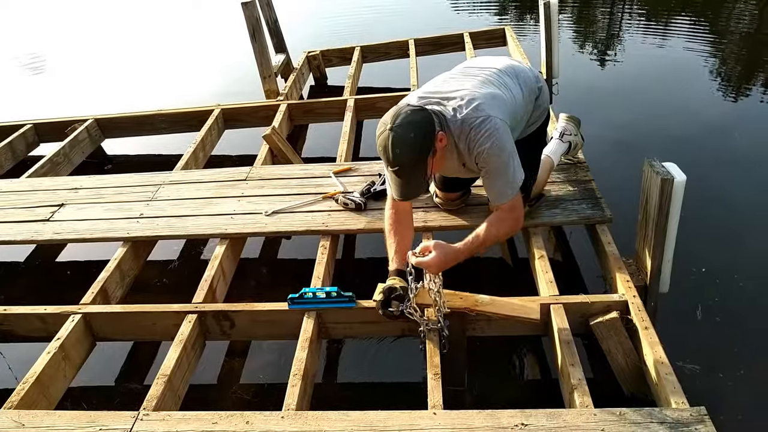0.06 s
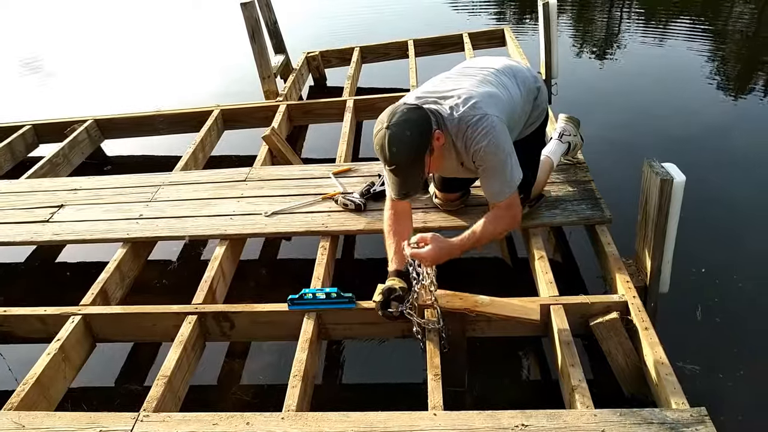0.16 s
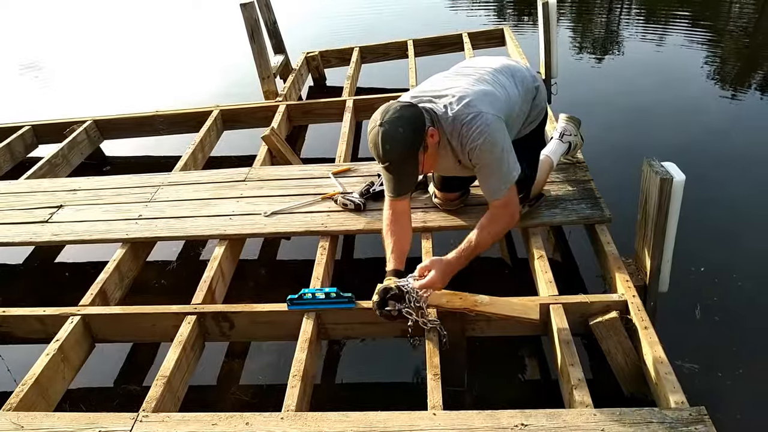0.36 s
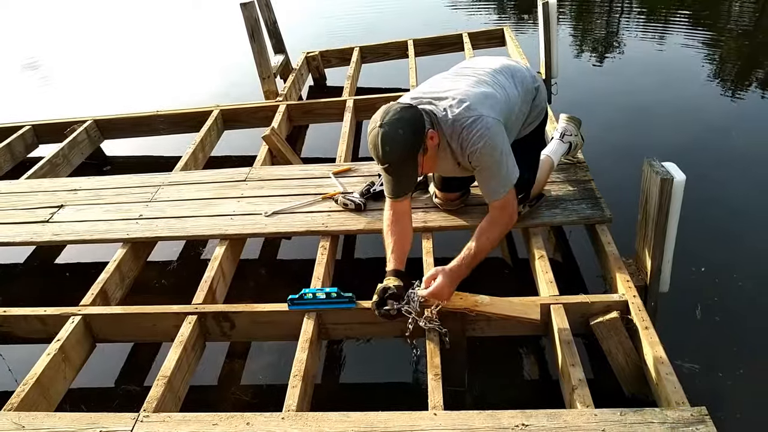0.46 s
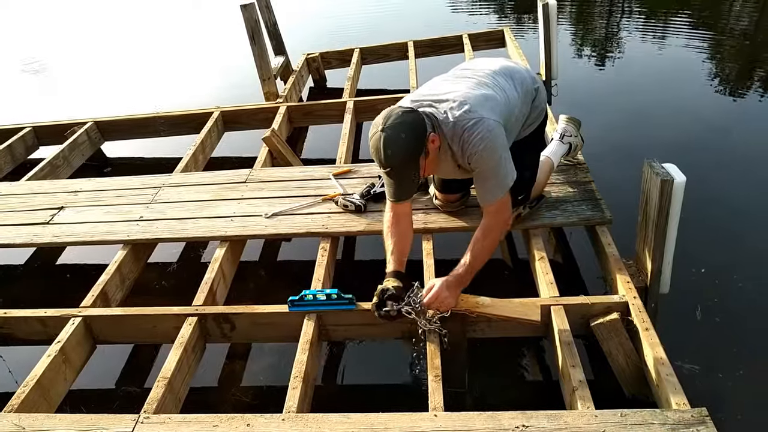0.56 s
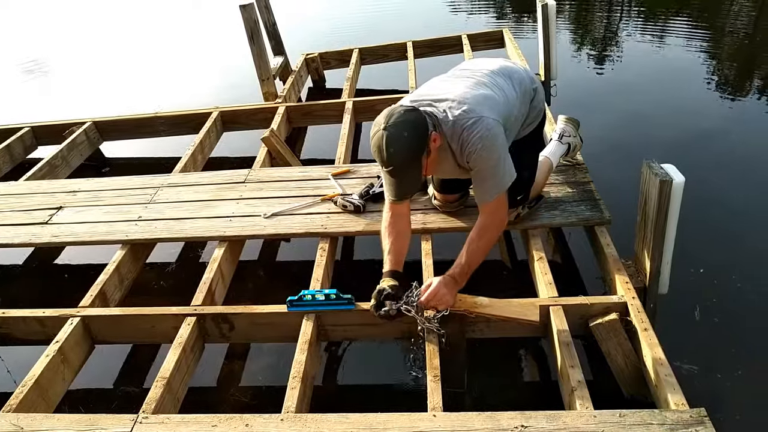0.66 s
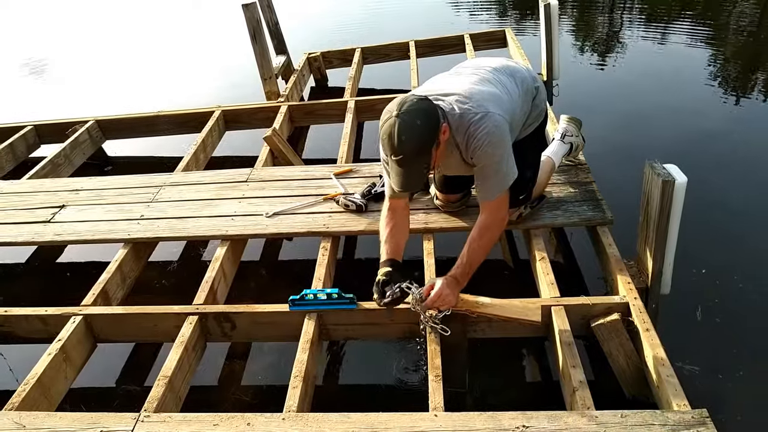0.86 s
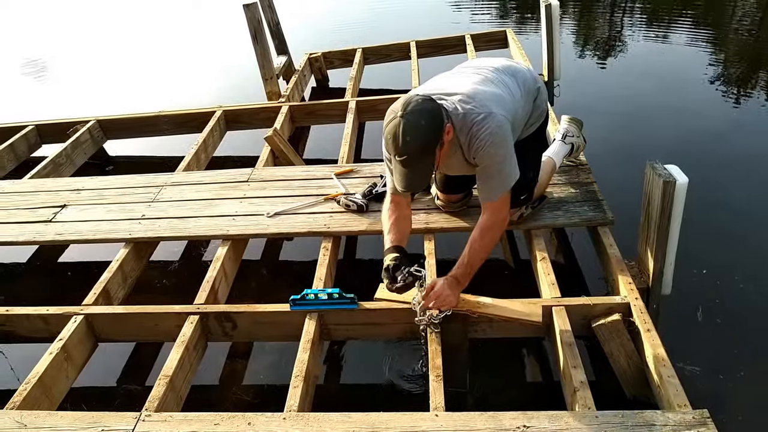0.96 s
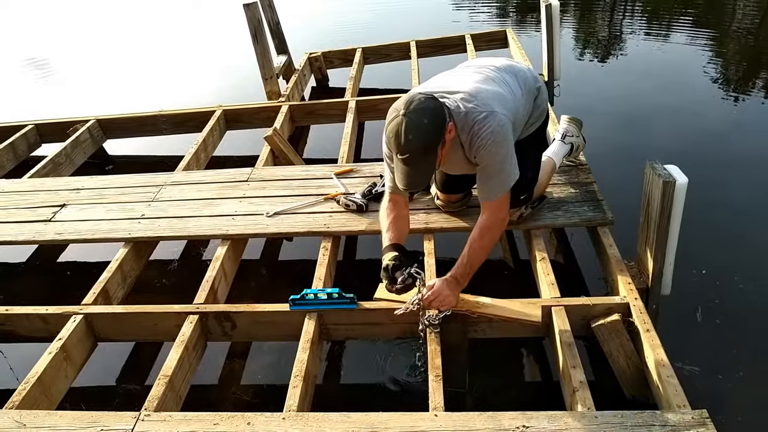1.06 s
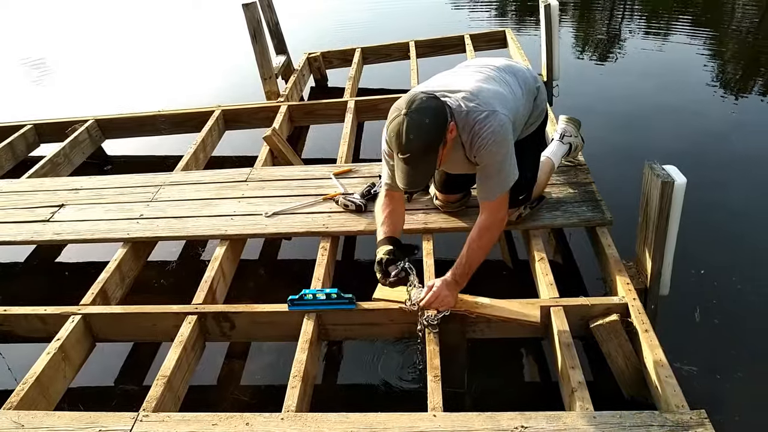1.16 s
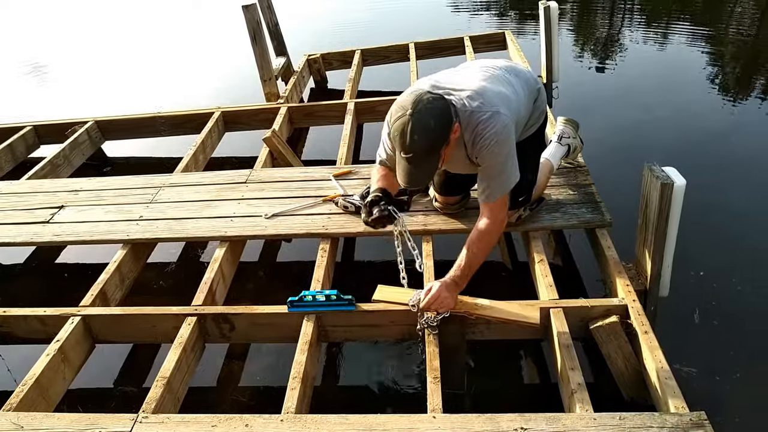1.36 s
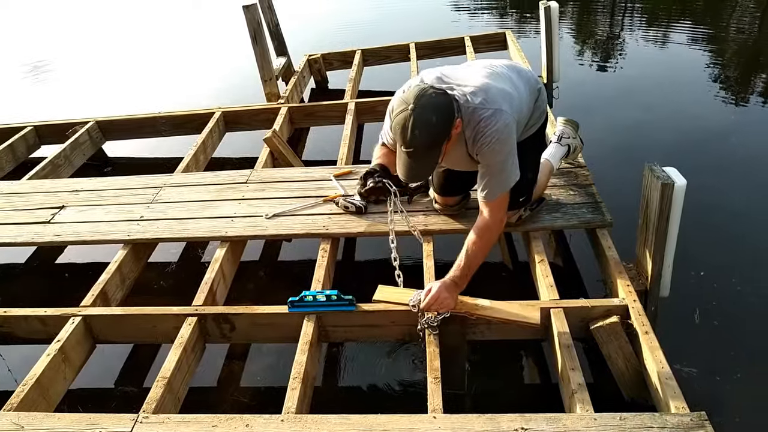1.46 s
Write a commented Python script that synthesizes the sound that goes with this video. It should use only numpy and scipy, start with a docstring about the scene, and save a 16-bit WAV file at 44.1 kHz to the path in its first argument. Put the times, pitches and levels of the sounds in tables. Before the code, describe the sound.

Small metal chain links jingle brightly on timber, then thin to soft ticks.

```python
"""Faint wind blows over open water as a steel chain is lowered onto the joists of a wooden dock.
From the start its small links collide, ticking and ringing very high in their bending modes, and
the timber rumbles where they slide. A larger steel piece clinks; then the wood knocks and the
rattle peaks. After a lull the larger piece clinks again, and the chain is picked at and lifted
in sparser, softer ticks and knocks."""
import sys
import numpy as np
from scipy import signal
from scipy.fft import rfft, irfft, next_fast_len
from scipy.io import wavfile
from scipy.ndimage import map_coordinates

SR = 44100
rng = np.random.default_rng(int(sys.argv[2]) if len(sys.argv) > 2 else 0)


def int16_out(signal):
    """Quantize to a 16-bit WAV file."""
    q = np.round(np.clip(np.atleast_2d(signal).T, -1, 1) * 32767)
    wavfile.write(sys.argv[1], SR, q.astype(np.int16))


N = 66150
STEEL_WIDTH, WOOD_WIDTH, WIND_WIDTH = 0.74, 0.41, 0.16  # side over mid
SIDES = np.array([[1], [-1]])  # left, right


def amp(db):
    """Amplitude ratio of a level in decibels."""
    return 10 ** (np.asarray(db) / 20)


def unit(x):
    """Normalisation to an rms of 1."""
    return x / np.sqrt(np.mean(x ** 2) + 1e-20)


def fade(t, t60):
    """Exponential damping: 60 dB lost in t60 seconds."""
    return np.exp(-np.log(1000) * t / t60)


def rise(t, attack_s):
    """First-order build-up with time constant attack_s."""
    return 1 - np.exp(-t / attack_s)


def add(out, start_s, x):
    """Superposition: x joins out from start_s on."""
    i = min(max(round(start_s * SR), 0), N - 1)
    out[:, i:i + x.shape[1]] += x[:, :N - i]


def colour(x, points, tilt=0):
    """Minimum-phase filter of unit power gain through (Hz, dB) points, tilted in dB per octave."""
    m = 2 * next_fast_len(x.shape[1])
    octave = np.log2(np.fft.rfftfreq(m, 1 / SR) + 1)
    hz, db = np.transpose(points)
    gain = unit(amp(np.interp(octave, np.log2(hz), db + tilt * np.log2(hz))))
    cepstrum = irfft(np.log(np.maximum(gain, 1e-6)))
    cepstrum[1:m // 2] *= 2  # folding onto positive time makes the filter causal
    cepstrum[m // 2 + 1:] = 0
    return irfft(rfft(x, m) * np.exp(rfft(cepstrum)), m)[:, :x.shape[1]]


def noise(count, width):
    """Partly coherent stereo white noise; width is side over mid."""
    mid, side = rng.standard_normal((2, count))
    return mid + width * side * SIDES


def panned(x, db):
    """Level difference: db is added left and taken right."""
    return x * amp(db * SIDES)


def contacts(curve, per_s, scatter_db):
    """A random point process: contact times, with gains scattered about a level curve."""
    jitter, chance = rng.random((int(per_s * N / SR), 2)).T
    times = (np.arange(len(jitter)) + 2 * jitter) / per_s
    size = unit(amp(scatter_db * np.minimum(-np.log(1 - chance), np.pi)))
    return zip(times, size * amp(np.interp(times, *np.transpose(curve))))


# Spectrum of the wind: frequency_hz, level_db
WIND_SPECTRUM = [(20, -33), (60, 4), (130, 0), (280, 5.5), (600, -4.5), (1300, -25.5), (3000, -13.5),
                 (8000, -17.5), (16000, -89)]
def wind(level_db=-72.5, swell_db=4):
    """Amplitude-modulated noise: light wind over the water swells gently."""
    swell = map_coordinates(rng.standard_normal(12), [np.linspace(0, 10, N)])
    return amp(level_db + swell_db * swell) * colour(noise(N, WIND_WIDTH), WIND_SPECTRUM)


def ring(t, hz, t60):
    """Damped free vibration of one steel mode, arriving left and right out of step."""
    phase = STEEL_WIDTH * rng.uniform(0.82, 1) * rng.choice([-1, 1]) * SIDES
    return np.sqrt(2) * np.sin(2 * np.pi * hz * t + phase) * fade(t, t60) * rise(t, 0.00071)


def tick(t, rebound_s=0.00405, attack_s=.0002, chink_hz=8500):
    """Impact transient of steel on steel: a touch, a rebound, chatter and three brief pitched chinks."""
    since_rebound = np.maximum(t - rebound_s * rng.uniform(0.518, 1), 0)
    touch, rebound = (fade(age, t60=0.0036) * rise(age, attack_s) for age in (t, since_rebound))
    chatter = amp(-8.5) * fade(t, t60=0.036) * rise(t, rebound_s / 2)
    crack = noise(len(t), STEEL_WIDTH) * (touch + amp(-1) * rebound + chatter)
    chinks = sum(ring(t, chink_hz * np.exp(.15 * z), t60=.03) for z in rng.standard_normal(size=3))
    return crack + amp(-9) * chinks / 2 * rise(t, attack_s)


# Spectrum of a tick: frequency_hz, level_db
TICK_SPECTRUM = [(1000, -15.5), (2800, -14.5), (5300, -11.5), (7000, -5.5), (8600, -2.5), (10500, -6),
                 (12700, -3.5), (14000, 7), (15200, 2.5), (16000, -30)]
def steel_response(ticks):
    """Resonant filtering: the ticks are strongest near the pitch of the links."""
    return colour(ticks, TICK_SPECTRUM)


# Bending modes of a link, two lower and one upper, all near 14 kHz: pitch_hz
LINK_MODES_HZ = [13835, 14165, 14850]
# Decay of the same modes: t60_s
LINK_DECAYS_S = [0.21, 0.05, 0.37]
SECOND_MODE_DB, RING_PAN_DB = -2, 2.5
# How hard the chain is shaken: time_s, level_db
SHAKING = [(0, -38), (.05, -43.5), (.17, -59.5), (.21, -46), (.29, -32), (.32, -26), (.42, -23.5),
           (.47, -32), (.52, -28.5), (.55, -26.5), (.62, -34.5), (.71, -64.5), (.79, -60), (.84, -38),
           (.9, -41.5), (.96, -43), (1.09, -76), (1.19, -48), (1.25, -85.5), (1.37, -55), (1.5, -74)]
def rattle(per_s=260, heap_damping=0.67, detune=.0048):
    """Incoherent summation: many links collide, each at its own pitch, damped by the moving heap."""
    def share(x):
        """Energies add: per_s such contacts a second have unit power."""
        return x / np.sqrt(np.sum(x ** 2) / 2 * per_s / SR)

    rings, ticks = np.zeros((2, 2, N))
    t = np.arange(SR // 6) / SR
    modes = list(zip(LINK_MODES_HZ, [0, SECOND_MODE_DB, -14], LINK_DECAYS_S))
    for start_s, gain in contacts(SHAKING, per_s, scatter_db=2.8):
        link = sum(amp(db) * ring(t, hz * (1 + detune * rng.normal()), t60 * heap_damping)
                   for hz, db, t60 in modes)
        add(rings, start_s, gain * share(link))
        add(ticks, start_s, gain * share(tick(t[:len(t) // 4])))
    return amp(-2.5) * panned(rings, RING_PAN_DB) + amp(-13) * panned(steel_response(ticks), db=-0.07)


# Links dragging over the joist: time_s, level_db
DRAGGING = [(0, -73.5), (.11, -74), (.15, -63), (.2, -69.5), (.26, -59.5), (.33, -54), (.47, -56.5),
            (.62, -54), (.66, -70), (.73, -73.5), (.82, -71.5), (.87, -64.5), (.96, -74), (1.05, -82),
            (1.13, -70), (1.35, -74.5), (1.38, -66), (1.42, -68), (1.46, -84.5)]
# Response of the joist: frequency_hz, level_db
JOIST_SPECTRUM = [(60, -15.5), (170, -14.5), (260, 0.5), (480, -0.5), (800, 2), (1350, -7.5), (1850, -6),
                  (2180, -0.5), (2750, -12), (5000, -8.5), (9000, -19)]
def drag(per_s=300, clack_hz=850, decay_cycles=11):
    """Forced vibration: sliding links bump the joist, each with dull noise and a brief pitch."""
    out, t = np.zeros((2, N)), np.arange(SR // 25) / SR
    for start_s, gain in contacts(DRAGGING, per_s, scatter_db=2):
        hz = clack_hz * np.exp(.66 * np.clip(rng.normal(), -2, 2))
        clack = np.sin(2 * np.pi * hz * t) * fade(t, decay_cycles / hz)
        burst = noise(len(t), WOOD_WIDTH) * fade(t, t60=.016)
        bump = amp(-3.5) * unit(burst) + amp(-9) * unit(clack)
        add(out, start_s, gain * bump * np.sqrt(SR / per_s / len(t)))
    return colour(out, JOIST_SPECTRUM)


def flutter(t, depth_db=3, per_s=90):
    """Amplitude modulation: the gain wavers as a ringing link swings."""
    knots = rng.standard_normal(int(t[-1] * per_s) + 2)
    return unit(amp(depth_db * map_coordinates(knots, [t * per_s])))


# Single links striking, levels relative: start_s, tick_db, lower_ring_db, upper_ring_db
LINK_STRIKES = [(.001, -53.5, -38.5, -53), (0.032, -59, -38, -55), (.081, -43.5, -42, -56),
                (.143, -50.5, -46, -54.5), (.185, -39.5, -31, -46), (.237, -48, -31.5, -49),
                (0.251, -41.5, -33, -41), (.262, -39.5, -41, -46), (.308, -36.5, -21, -30),
                (0.315, -35, -22.5, -31), (.331, -34, -18.5, -25), (.356, -36.5, -27, -37),
                (0.388, -32.5, -32, -47), (0.406, -29, -24.5, -40), (0.426, -38, -27, -38),
                (.433, -40, -18, -31), (0.484, -45, -24.5, -42), (.495, -36, -18, -40),
                (0.501, -30.5, -20, -36), (.507, -32, -44, -37), (.543, -31.5, -38, -45),
                (0.763, -42.5, -79, -83), (0.804, -47.5, -58, -56), (.861, -38, -39, -55),
                (.872, -52, -38, -32.5), (.978, -45, -49, -43.5), (0.999, -43, -61, -71),
                (1.017, -45.5, -31, -41), (1.054, -48.5, -38, -38.5), (1.113, -51.5, -45.5, -69),
                (1.139, -46.5, -36.5, -37), (1.165, -62, -37, -49), (1.213, -53.5, -49.5, -69),
                (1.329, -55.5, -48, -64), (1.471, -54, -74, -97)]
def clinks(free_detune=.0025, held_detune=.0048):
    """Contact damping: a free link strikes a gripped one and rings until the next strike chokes it."""
    rings, ticks = np.zeros((2, 2, N))
    t = np.arange(SR // 3) / SR
    gaps = np.diff([row[0] for row in LINK_STRIKES], append=N / SR)
    for (start_s, tick_db, lower_db, upper_db), gap_s in zip(LINK_STRIKES, gaps):
        choke = fade(np.maximum(t - gap_s, 0), t60=0.14)
        add(ticks, start_s, 2 * amp(tick_db) * tick(t))
        levels_db = [lower_db, lower_db + SECOND_MODE_DB, upper_db]
        for hz, db, t60 in zip(LINK_MODES_HZ, levels_db, LINK_DECAYS_S):
            free = ring(t, hz * (1 + free_detune * rng.normal()), t60) * flutter(t) * choke
            held = ring(t, hz * (1 + held_detune * rng.normal()), t60=.06)
            add(rings, start_s, amp(db) * (free + amp(-4) * held))
    return panned(rings, RING_PAN_DB) + steel_response(ticks)


# Strikes on the larger steel piece: start_s, level_db
SHACKLE_STRIKES = [(.185, -51), (.862, -42), (.868, -45)]
# Its modes: pitch_hz, level_db, t60_s
SHACKLE_PARTIALS = [(5660, -14, 0.027), (9170, 5, 0.061), (9380, 1, 0.045), (11800, 5, 0.029)]
def shackle(split=0.0027):
    """Beating: a larger piece, perhaps a shackle, cracks and rings in close pairs of modes."""
    out, t = np.zeros((2, N)), np.arange(SR // 3) / SR
    for start_s, level_db in SHACKLE_STRIKES:
        tone = 0
        for hz, db, t60 in SHACKLE_PARTIALS:
            mode = ring(t, hz, t60)
            twin = ring(t, hz * (1 + split * rng.normal()), t60 / 2)
            tone += amp(db) * (mode + .5 * twin)
        crack = amp(1.5) * noise(len(t), STEEL_WIDTH) * fade(t, t60=0.004)
        add(out, start_s, amp(level_db) * (tone + crack))
    return panned(out, RING_PAN_DB)


# Knocks on the timber: start_s, thud_db, tilt_db_per_octave, pitch_hz, note_db
TIMBER_KNOCKS = [(.277, -36.5, 7.5, 1184, -38), (.331, -40, 2, 883, -39.5), (.346, -40.5, -3, 519, -37),
                 (.358, -60, 7.5, 2250, -43.5), (.374, -61, -2, 744, -41.5), (.398, -41, 1, 354, -44.5),
                 (0.422, -39.5, 6, 2210, -31.5), (.459, -39, 8.5, 2170, -47), (0.51, -45, 5.5, 96, -69.5),
                 (0.543, -43.5, 5.5, 2180, -31.5), (0.792, -66, 2, 261, -55.5),
                 (0.848, -47, 3, 296.5, -45.5), (.863, -67.5, -8, 417, -48.5), (.934, -73, 0, 301, -50.5),
                 (0.994, -61.5, 1.5, 470, -56.5), (1.03, -60, 8, 2010, -54), (1.086, -55, 1, 797, -57.5),
                 (1.126, -53.5, -1, 1320, -53.5), (1.202, -61.5, -2, 254, -53.5),
                 (1.263, -43, 6.5, 448.4, -38), (1.294, -49, -4, 474, -52), (1.47, -60.5, -3.5, 361, -52)]
# Spectrum of a thud before tilting: frequency_hz, level_db
THUD_SPECTRUM = [(50, -23.5), (150, -11.5), (450, 8), (1000, 6), (2300, -2.5), (3500, -33.5), (8000, -30)]
def knocks(decay_cycles=26.2):
    """Impact excitation: a thud plus a short hollow note that depends on where the timber is struck."""
    out, t = np.zeros((2, N)), np.arange(SR // 6) / SR
    for start_s, thud_db, tilt, hz, note_db in TIMBER_KNOCKS:
        note = np.sin(2 * np.pi * hz * t) * fade(t, decay_cycles / hz) * rise(t, 0.00053)
        thud_t60_s = 0.063 * 2 ** (-0.13 * tilt)  # harder, brighter knocks are shorter
        push = noise(len(t), WOOD_WIDTH) * fade(t, thud_t60_s) * rise(t, 0.001)
        add(out, start_s, amp(note_db) * note + amp(thud_db) * colour(push, THUD_SPECTRUM, tilt))
    return out


def deck(x, width, scatter_db=-5):
    """Scattering: brief reflections from the joists follow the direct sound."""
    t = np.arange(SR // 4) / SR
    tail = noise(len(t), width) * fade(t, t60=0.11)
    reflections = signal.fftconvolve(x, tail / np.linalg.norm(tail[0]), axes=1)[:, :N]
    return x + amp(scatter_db) * reflections


# Level added left and taken right for the timber: frequency_hz, pan_db
TIMBER_PAN = [(300, -0.9), (1000, 1.1), (2200, 2)]
def off_centre(wood, left_lag_s=.00007):
    """Time and level differences: the timber arrives later on the left, where its treble is louder."""
    m = next_fast_len(N + SR // 2)
    hz = np.fft.rfftfreq(m, 1 / SR)
    gain = amp(SIDES * np.interp(hz, *np.transpose(TIMBER_PAN)))
    delay = np.exp(-1j * np.pi * hz * left_lag_s * SIDES)
    return irfft(rfft(wood, m) * gain * delay, m)[:, :N]


def scene():
    """Superposition in open air: wind, timber and, a little to the left, steel."""
    air = wind()
    wood = deck(knocks() + drag(), WOOD_WIDTH)
    steel = deck(clinks() + shackle() + rattle(), STEEL_WIDTH)
    return air + off_centre(wood) + steel


def record(dry, top_hz=15700):
    """Band limiting: an ideal low-pass filter keeps nothing above top_hz."""
    m = next_fast_len(N + SR // 2)
    passband = np.fft.rfftfreq(m, 1 / SR) < top_hz
    return irfft(rfft(dry, m) * passband, m)[:, :N]


dry = scene()
out = record(dry)
int16_out(out)
```